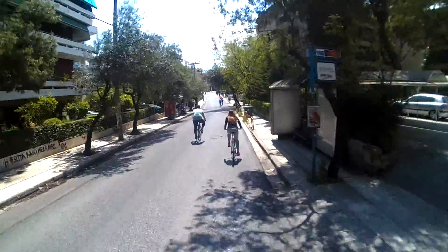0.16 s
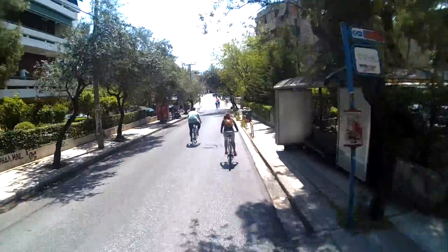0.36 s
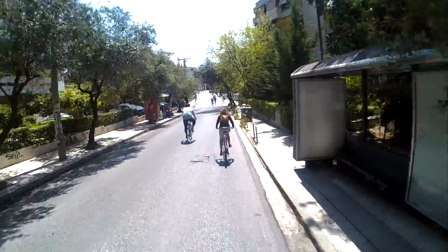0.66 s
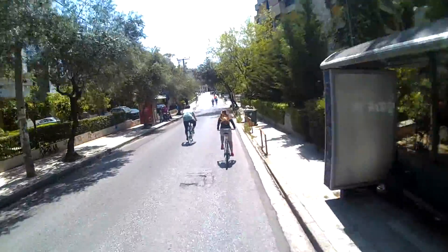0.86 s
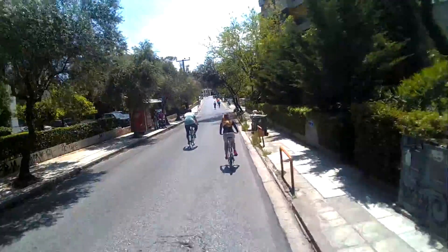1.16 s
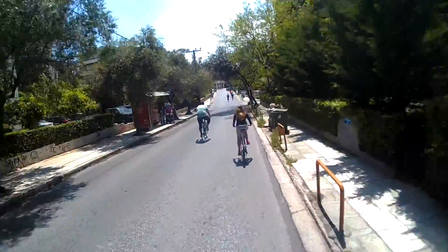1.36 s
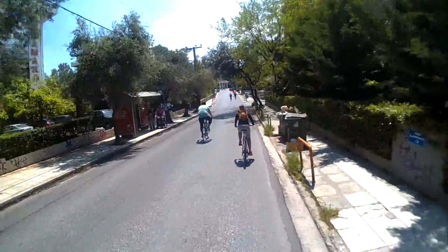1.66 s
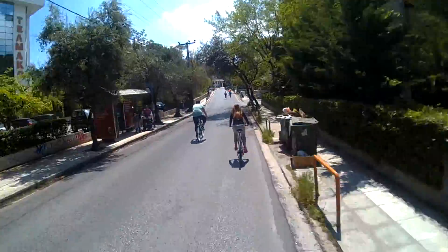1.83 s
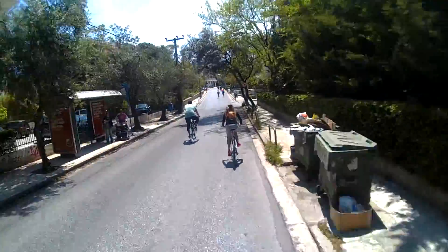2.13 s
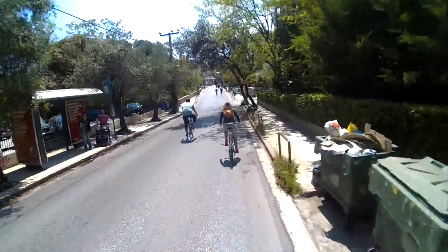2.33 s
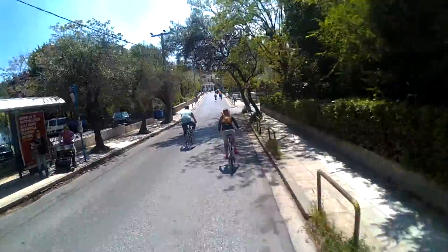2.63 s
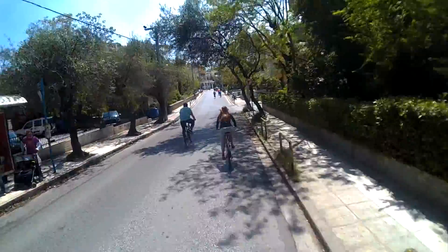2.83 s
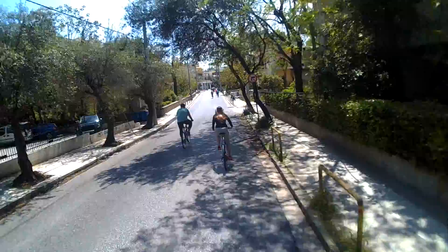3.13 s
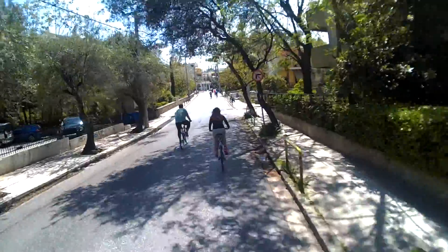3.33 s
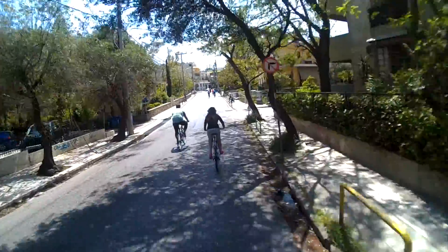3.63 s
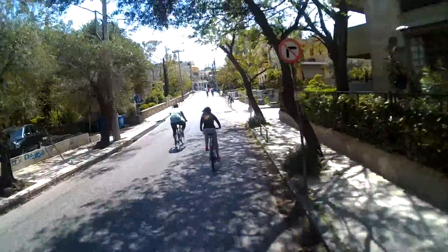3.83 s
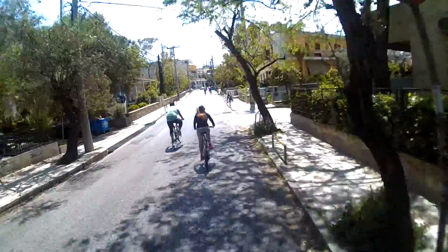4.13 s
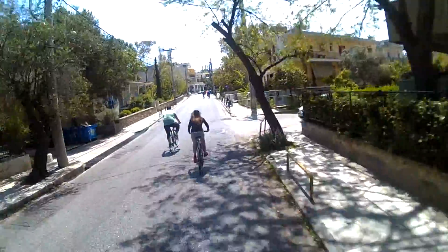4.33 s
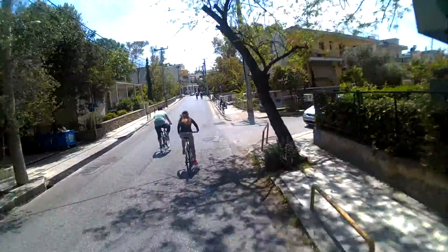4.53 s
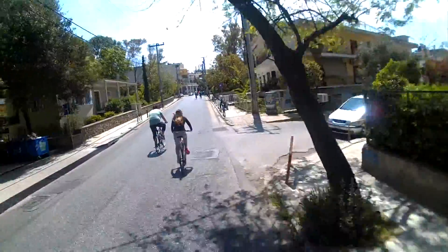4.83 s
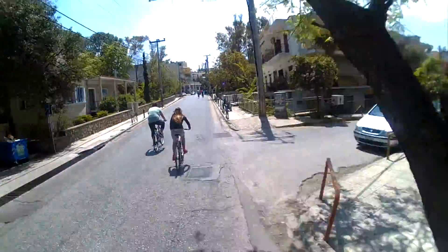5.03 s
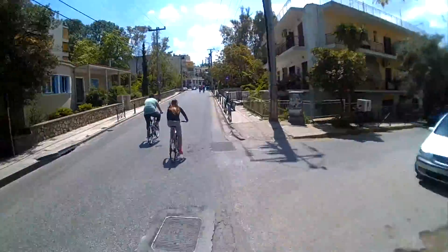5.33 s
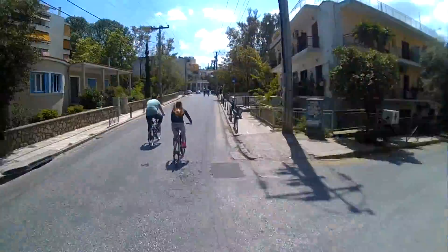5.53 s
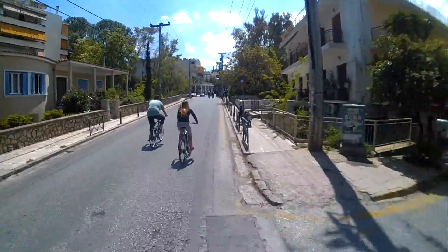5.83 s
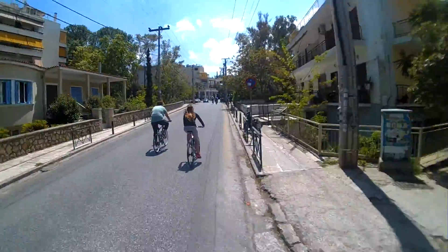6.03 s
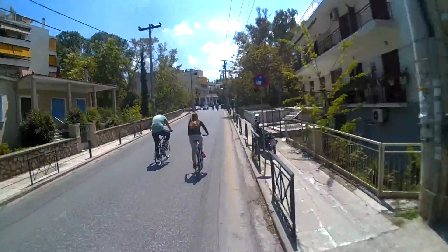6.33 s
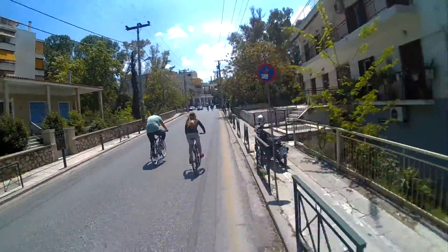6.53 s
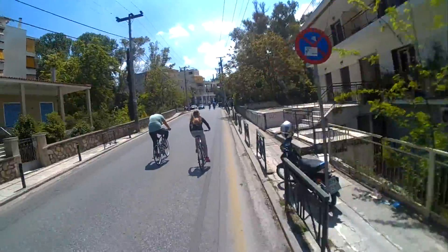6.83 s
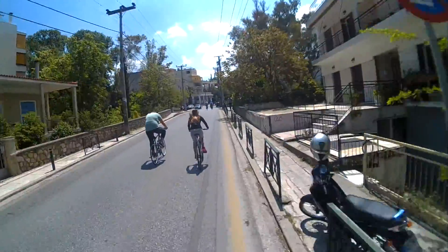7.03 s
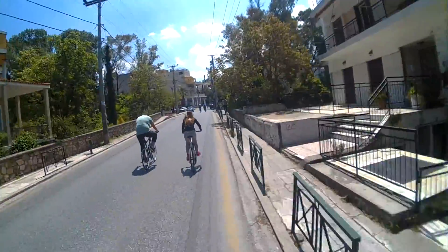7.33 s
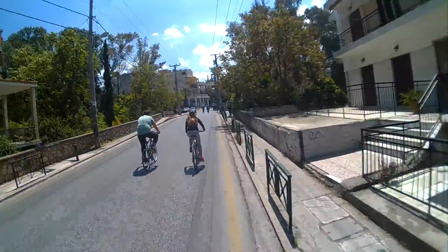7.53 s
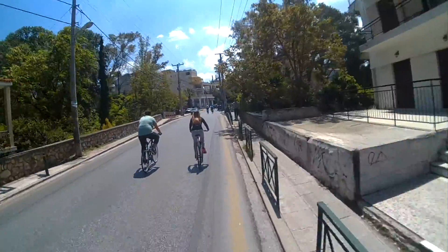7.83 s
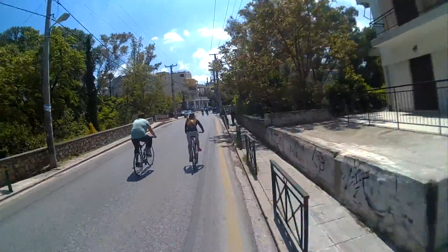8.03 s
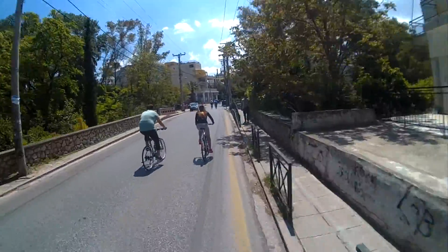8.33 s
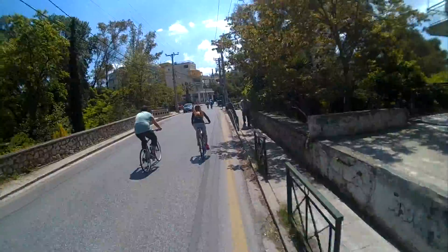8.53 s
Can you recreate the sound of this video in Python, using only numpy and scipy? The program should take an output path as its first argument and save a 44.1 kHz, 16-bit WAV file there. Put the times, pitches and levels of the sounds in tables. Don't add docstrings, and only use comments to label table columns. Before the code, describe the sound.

A bicycle rolls fast over asphalt, its shaking camera housing buzzing hollowly with muffled wind bumps and scattered clusters of plastic ticking rattles.

```python
import sys
import numpy as np
from scipy import signal
from scipy.fft import rfft, irfft, next_fast_len
from scipy.io import wavfile
from scipy.ndimage import uniform_filter1d, minimum_filter1d

SR = 44100
rng = np.random.default_rng(int(sys.argv[2]) if len(sys.argv) > 2 else 0)


def gain_from_db(level_db):
    decades = np.asarray(level_db, float) / 20
    return 10 ** decades


def unload_audio(sound):
    columns = np.transpose(np.atleast_2d(sound))
    steps = np.round(np.clip(columns, -1, 1) * 32767)
    wavfile.write(sys.argv[1], SR, steps.astype(np.int16))


N = 382347

# (time [s], level [dB], length [ms])
ROAD_JOLTS = [(0.186, 4.5, 13), (1.001, 4, 26), (1.22, 6.5, 33), (1.265, -8, 62), (1.323, -9, 23),
              (1.947, -5, 72), (2.4, 7, 14), (2.44, 2.5, 21), (2.84, -3, 51), (2.887, 4, 57),
              (3.482, 3, 66), (3.855, 7.5, 51), (4.729, 3.5, 97), (5.301, 2, 29), (5.926, -3, 95),
              (5.995, -1, 27), (6.077, 5, 62), (6.121, 6, 9.5), (6.928, 6.5, 114), (7.04, 4.5, 44),
              (7.73, 2, 100), (7.14, -3, 120), (7.175, 3.5, 52), (7.6, -2.5, 90), (7.671, 2, 48),
              (8.102, -3, 83), (8.192, 2.5, 26.0), (8.232, 2, 27.0), (8.404, -8, 34), (8.476, 2, 26)]


def curve(points, hz):
    f, db = np.transpose(points)
    return np.interp(np.log(hz + 1), np.log(np.maximum.accumulate(f)), db, right=-140)


def response(points):
    size = 2048
    cepstrum = irfft(np.log(gain_from_db(curve(points, np.arange(size // 2 + 1) * SR / size))))
    cepstrum[1:size // 2] *= 2
    cepstrum[size // 2 + 1:] = 0
    h = irfft(np.exp(rfft(cepstrum)))
    return h / np.sqrt(np.sum(h ** 2))


def colour(x, points):
    return signal.fftconvolve(x, response(points))[:N]


def walk(rate):
    k = max(int(SR / rate), 2)
    held = np.repeat(rng.standard_normal(N // k + 1), k)
    return 1.02 * uniform_filter1d(uniform_filter1d(held, k), k)[:N]


def bumps(events):
    t, out = np.arange(N) / SR, np.zeros(N)
    for s, db, ms in events:
        near = slice(max(int((s - ms / 500) * SR), 0), int((s + ms / 500) * SR))
        out[near] += db * np.exp(-(2 * (t[near] - s) / (ms / 1200)) ** 2)
    return out


def bands(x, points, centres_hz):
    size = next_fast_len(N)
    hz = np.arange(size // 2 + 1) * SR / size
    spectrum = rfft(x, size) * gain_from_db(curve(points, hz))
    spectrum *= size / np.sqrt(2 * np.sum(np.abs(spectrum) ** 2))
    for row in np.eye(len(centres_hz)):
        weight = np.interp(np.log(hz + 1), np.log(centres_hz), row)
        yield irfft(spectrum * weight, size)[:N]


def preamp_noise():
    # (frequency [Hz], density [dB per Hz])
    hiss_curve = [(5000, -27.5), (6600, -1.5), (8000, -12.5), (10000, 0.5), (15500, -2.5), (18000, -12.5)]
    whine = np.sin(2 * np.pi * np.cumsum(15090 + 50 * walk(40)) / SR)
    return gain_from_db(-86) * colour(rng.standard_normal(N), hiss_curve) + gain_from_db(-91) * whine


def leak(db):
    # (frequency [Hz], density [dB per Hz])
    gap_curve = [(4500, -25), (5500, -4.5), (6700, 7), (7600, -1.5), (9000, -7.5), (10600, -1.5),
                 (13000, -12), (15500, -21.5), (18000, -30.5)]
    level = db + 4.5 + .7 * bumps(ROAD_JOLTS) + 1.8 * walk(60) + 1.2 * walk(13)
    return colour(rng.standard_normal(N), gap_curve) * gain_from_db(level)


def buffet(gust_db, rumble_db):
    # (time [s], level [dB], length [ms])
    eddies = [(0.23, -4.5, 120), (0.72, 3, 120), (0.947, -12.5, 32), (0.991, 5.5, 60), (1.188, -6.0, 52),
              (1.233, 6.5, 24), (1.312, 6, 34), (1.377, -7.5, 55), (1.456, 7.5, 24), (1.945, 8, 26),
              (2.05, 3.5, 56), (2.365, 10, 99), (2.445, 8, 76), (2.918, 7.5, 60), (3.475, 14, 37),
              (3.849, 13.5, 44), (5.778, 2.5, 27), (5.988, 6.5, 33), (6.344, 7.5, 55), (6.506, 5, 36),
              (6.708, 7.5, 15), (6.94, 10, 40), (7.163, 11, 22), (7.933, -6.5, 52), (8.018, 4, 63),
              (8.155, 5.5, 43), (8.249, -8.5, 28), (8.472, 5.5, 68), (8.548, -9, 96), (8.618, 9.5, 32)]
    # (frequency [Hz], density [dB per Hz])
    pressure_curve = [(15, -13), (30, -4.5), (60, -1.5), (150, -2.5), (280, 0), (450, -1), (800, -4.5),
                      (1600, -5.5), (3200, -62)]
    lumps = rng.standard_normal(N) * gain_from_db(1.69 * walk(60) + bumps(eddies))
    parts = bands(lumps, pressure_curve, 30 * 2. ** np.arange(6))
    low, middle, high = rumble_db + 11.5, (gust_db + rumble_db) / 2 + 9.5, gust_db + 4.5
    levels = [low, low, middle, high, high, high]
    return sum(band * gain_from_db(level + 2.3 * walk(24)) for band, level in zip(parts, levels))


def knocks():
    # (time [s], pitch [Hz], level [dB], length [ms])
    tonal_hits = [(.582, 220, -27, 20), (.688, 201, -25.5, 20), (.745, 260, -26.5, 25),
                  (.998, 1272, -12, 9.2), (1.021, 1270, -18, 5.4), (1.295, 250, -27, 18),
                  (1.535, 1330, -20.5, 9), (2.43, 1383, -26, 5), (3.85, 1404, -23, 6),
                  (5.991, 1465, -17.5, 8.1), (7.159, 900, -24.5, 13), (7.171, 1292, -18, 11),
                  (7.187, 1373, -23, 24), (7.247, 1430, -24, 19), (7.66, 1304, -19, 4.7),
                  (7.667, 1370, -20, 15), (8.18, 1250, -22, 22), (8.22, 1260, -23.5, 25),
                  (8.634, 1120, -28, 44)]
    out, t = np.zeros(N), np.arange(N) / SR
    waver = np.cumsum(60 * walk(150)) / SR
    for s, hz, db, ms in tonal_hits:
        u = (t - s) / (ms / 1000)
        on = (u > 0) & (u < 1.5)
        shape = np.minimum(u[on] / .2, 1) * np.exp(-u[on] ** 4)
        out[on] += gain_from_db(db + 2.5) * shape * np.sin(2 * np.pi * (hz * t[on] + waver[on]))
    return out


def contacts():
    # (time [s], click [dB], shell ring [dB], bouncing lasts [ms])
    throws = [(.655, -72, -22, 8), (.6903, -63, -23, 9.2), (1.3985, -58, -16.5, 5), (1.4602, -46, -13.5, 5),
              (1.4837, -47.5, -11.5, 5.9), (2.3834, -50, -17, 5), (3.8499, -60, -25, 4),
              (5.4603, -38, -6.5, 8.7), (5.5496, -54.5, -16.5, 10), (5.7205, -47, -14.5, 17),
              (5.7758, -34, -6.5, 13), (5.8556, -47.5, -14.5, 19), (5.8961, -48.5, -13, 7.9),
              (5.9516, -52, -22, 6), (6.0933, -40.5, -14.5, 5), (6.1802, -44, -15, 20),
              (7.1521, -49, -15, 4), (7.2215, -46.5, -10, 17), (6.124, -42.5, -15, 6),
              (7.657, -55, -17.5, 9.9), (7.777, -66, -21.5, 5), (7.6817, -47, -13.5, 15),
              (8.12, -60, -21, 2.5), (8.1977, -61.5, -33, 11.7)]
    # (time [s], click [dB], shell ring [dB], lasts [ms])
    rolls = [(.671, -53.5, -19.5, 11), (1.302, -56.5, -18, 11), (3.864, -49.5, -27, 13),
             (5.129, -50.5, -12.5, 9.1), (5.4132, -44.5, -12, 13), (5.4843, -59.5, -14, 12),
             (5.585, -60, -16, 12), (6.112, -42, -6, 11), (6.2731, -44.5, -9, 8), (7.1688, -54, -17, 18),
             (7.192, -61, -23, 8.2)]
    # (time [s], click [dB], shell ring [dB])
    touches = [(.0061, -67, -20), (0.1313, -65, -19.5), (0.149, -52, -19), (0.713, -72, -17),
               (.7225, -60, -12.5), (0.7655, -60, -31), (0.8608, -70, -16.5), (1.1328, -51.5, -14),
               (1.1767, -71, -19), (1.3593, -62, -38), (1.4488, -56, -23), (1.637, -65, -20),
               (2.157, -65, -22), (2.4473, -52.5, -16), (3.9223, -62, -20), (5.115, -56, -42),
               (5.239, -56.5, -13), (5.2765, -76, -16), (5.635, -52.5, -9), (5.7737, -61, -25.5),
               (5.8045, -68, -27), (5.9398, -61, -15), (5.9124, -59, -40), (6.137, -57, -18),
               (6.2082, -72, -26), (6.377, -50.5, -13), (7.285, -53, -23), (7.765, -56, -34),
               (8.393, -64, -19)]
    bounce_ms, touch_ms = 3.8, 1.5
    s, click_db, ring_db, lasts_ms = np.transpose(list(throws) + list(rolls))[:, :, None]
    is_roll = (np.arange(len(s)) >= len(throws))[:, None]
    hardest_ms = lasts_ms * 0.78 * is_roll
    k = np.arange(9)
    gap, click, ring, spread = np.moveaxis(rng.standard_normal((len(s), len(k), 4)), 2, 0)
    late_ms = bounce_ms * (k + .2 * gap * (k > 0))
    away = np.abs(late_ms - hardest_ms) / bounce_ms
    settle_db = 8.0 * np.maximum(late_ms - lasts_ms, 0)
    scatter_db = 2.5 * np.minimum(away, 1)
    rows = [s + late_ms / 1000,
            click_db - 5 * away + scatter_db * click - settle_db,
            ring_db - 1.9 * away + scatter_db * ring - settle_db,
            2.1 * np.exp(.4 * spread)]
    bounces = np.reshape(rows, (len(rows), -1))
    singles = np.transpose([(*row, touch_ms) for row in touches])
    return np.hstack([bounces, singles])


def rattle():
    # (frequency [Hz], level [dB])
    shell_curve = [(1200, -34), (2000, -13.5), (2400, -11), (2750, 0), (2900, -0.5), (3300, 0.5),
                   (3850, -15), (4050, -13.5), (4450, -17.5), (4800, -28.5), (5150, -29.5), (5700, -42),
                   (6700, -41), (8200, -63)]
    # (frequency [Hz], level [dB])
    click_curve = [(4500, -37), (5600, -9), (6500, -5), (7600, -9.5), (8400, -6.5), (9700, 2), (10700, 2),
                   (11700, 2), (13500, -5.5), (15500, -15), (18000, -27)]
    out, t = np.zeros(N), np.arange(900) / SR
    s, click_db, ring_db, ms = contacts()
    scrapes = rng.standard_normal((len(s), len(t)))
    for points, db, extra_ms in ((click_curve, click_db + 5.5, .3), (shell_curve, ring_db + 0.1, 1.4)):
        u = t / ((ms[:, None] + extra_ms) / 1000)
        blows = scrapes * np.minimum(u / .2, 1) * np.exp(-u ** 3)
        sounds = signal.fftconvolve(blows, response(points)[None])[:, :len(t)]
        sounds *= (gain_from_db(db) / np.abs(sounds).max(axis=1))[:, None]
        for start, sound in zip((s * SR).astype(int), sounds):
            out[start:start + len(t)] += sound
    return out


def buzz(main_db, upper_db, treble_db):
    # (frequency [Hz], density [dB per Hz])
    cavity_curve = [(350, -27), (650, -17), (850, -12), (1080, -7.5), (1230, -3.5), (1350, 0.5),
                    (1470, -2.5), (1680, -6.5), (2050, -8), (2550, -12), (3100, -7.5), (3500, -14.5),
                    (4600, -32.5), (5980, -62.5)]
    grain = rng.standard_normal(N) * gain_from_db(1.27 * walk(220) + 0.18 * walk(50))
    centres = np.array([600, 850, 1100, 1350, 1650, 2050, 2500, 3000, 3600, 4400, 5300])
    jolt = bumps(ROAD_JOLTS)
    out = 0
    for hz, band in zip(centres, bands(grain, cavity_curve, centres)):
        share = [np.interp(np.log(hz), np.log([1500, 2100, 2900]), row) for row in np.eye(3)]
        db = share[0] * (main_db + 3.5) + share[1] * (upper_db + 7.0) + share[2] * (treble_db + 8.5)
        top = max(hz - 3600, 0) / 1700
        db = db + top * (0.64 * (treble_db + 33.5) + 1.5 * walk(30))
        out = out + band * gain_from_db(db + jolt + 2.14 * walk(25))
    return out


def scene():
    # (time [s], road shake [dB], airflow over the shell [dB], gust [dB])
    ride = [(0.0, -28.5, -39, -37.5), (0.51, -29, -40, -39), (0.89, -30.5, -34, -38),
            (1.23, -28.5, -35.5, -35), (1.57, -27, -30.5, -42.5), (1.93, -26, -32.5, -36.5),
            (2.61, -25, -31.5, -41), (4.25, -25, -31, -39.5), (4.54, -28, -33.5, -33),
            (4.95, -29.5, -33, -39.5), (5.43, -28, -34.5, -42), (5.96, -27.5, -37.5, -41),
            (6.86, -38, -42, -40), (7.1, -29, -39.5, -41.5), (7.58, -37, -41, -41),
            (7.92, -34.5, -40, -44.5), (8.31, -29.5, -40.5, -39), (8.67, -39, -42, -41)]
    # (time [s], level [dB], length [ms])
    side_wind = [(.21, 4.5, 360), (1.38, 4, 200), (1.7, 1.5, 510), (2.1, -2, 180), (3.35, 1, 360),
                 (4.75, -4.5, 500), (5.01, 6, 90), (5.13, 6, 250), (5.45, 5.5, 380), (5.72, 3, 250),
                 (6.2, 3, 250), (4.15, 1.5, 350), (7.4, -1.5, 230), (7.6, -5.5, 150), (8.25, -1, 200)]
    # (time [s], level [dB], length [ms])
    seals = [
        (.74, 11, 250),
        (1.6, -4.5, 400),
        (2.1, -7, 200),
        (2.75, 2.5, 300),
        (3.2, -2.5, 200),
        (4.7, 6, 800),
        (5.65, -11, 600),
        (6.35, 5, 200),
        (6.98, 7, 170),
        (7.85, 3, 200),
    ]
    s, *columns = np.transpose(ride)
    shake, air, gust = (np.interp(np.arange(N) / SR, s, c) for c in columns)
    shake, air, gust = shake + 0.43, air - 0.46, gust + 1.3
    extra_air = air + 32.5
    upper = 0.56 * air + (1 - 0.56) * shake + 3.0 + bumps(side_wind)
    rumble = -45.5 + .6 * (gust + 38.5) + 0.22 * extra_air
    hiss = -80 + 2.1 * extra_air + bumps(seals)
    treble = air + 0.55 * np.minimum(bumps(ROAD_JOLTS), 0)
    mix = leak(hiss) + buffet(gust, rumble) + knocks() + rattle() + buzz(shake, upper, treble)
    return mix[None]


def low_pass(x):
    return signal.sosfilt(signal.butter(12, 15830, fs=SR, output="sos"), x)


def record(dry):
    # (frequency [Hz], width [Hz])
    notches = [(5990, 530), (8000, 600)]
    crest = -minimum_filter1d(-np.abs(dry), size=129)
    x = dry * uniform_filter1d(np.minimum(.62 / (crest + 1e-9), 1), size=65)
    for hz, width_hz in notches:
        x = signal.lfilter(*signal.iirnotch(hz, hz / width_hz, fs=SR), x)
    x = x + preamp_noise()
    x = signal.sosfilt(signal.ellip(8, .5, 60, 15770, fs=SR, output="sos"), x)
    return low_pass(x)


dry = scene()
out = record(dry)
unload_audio(out)
```